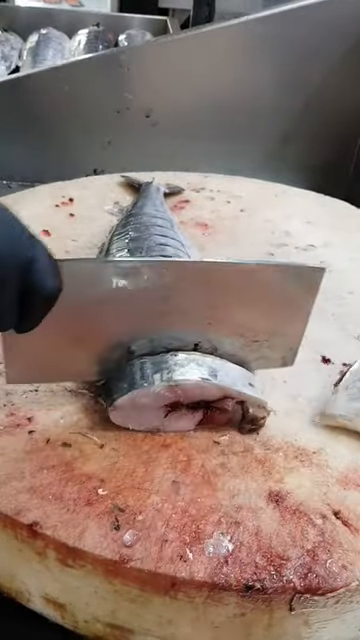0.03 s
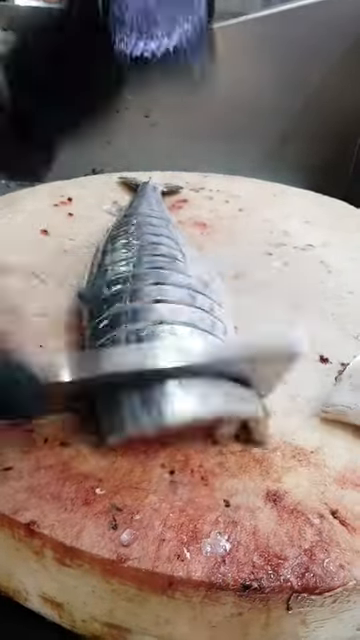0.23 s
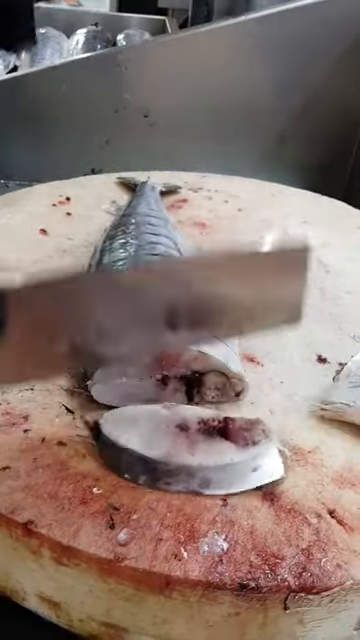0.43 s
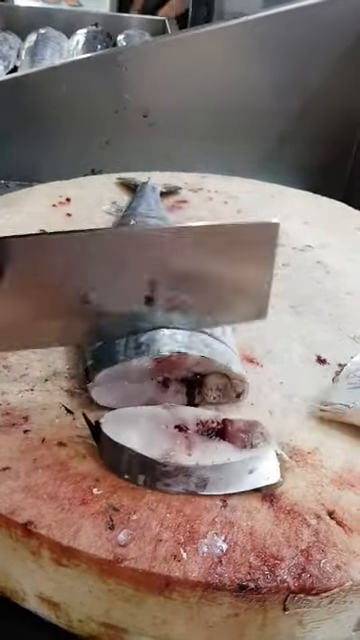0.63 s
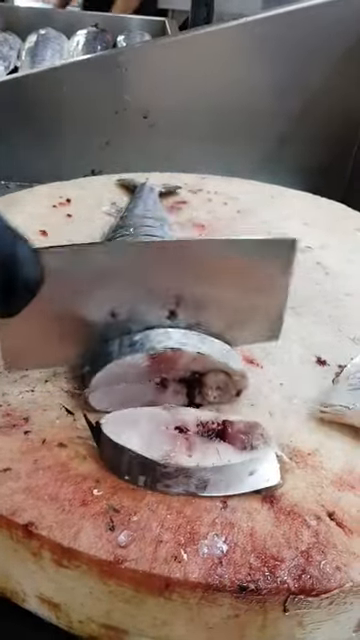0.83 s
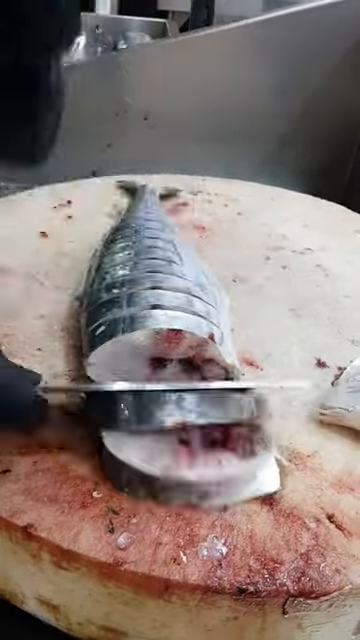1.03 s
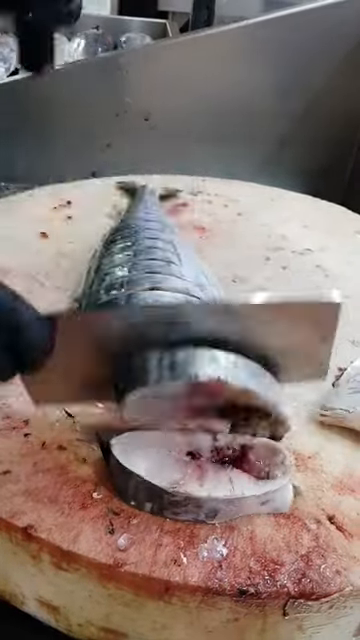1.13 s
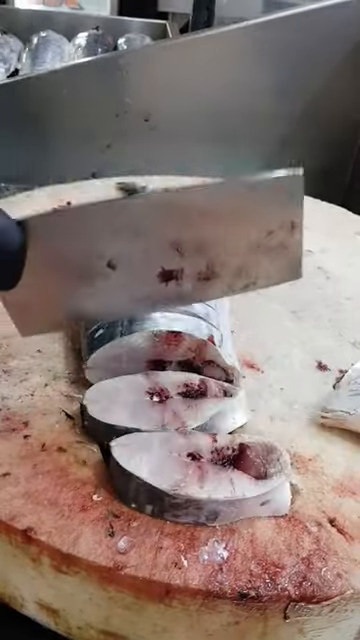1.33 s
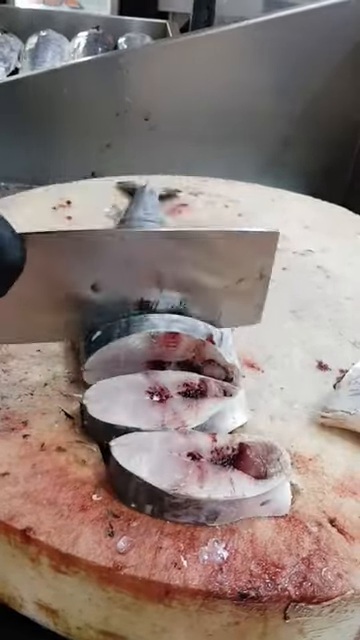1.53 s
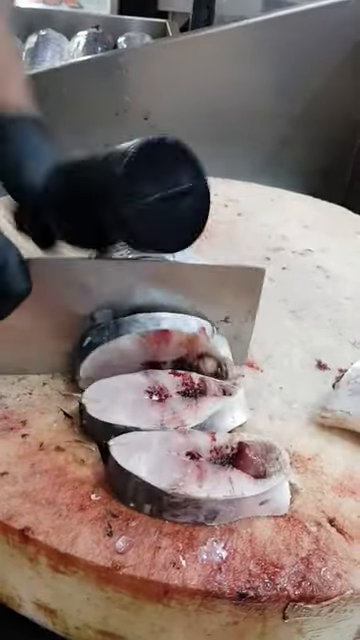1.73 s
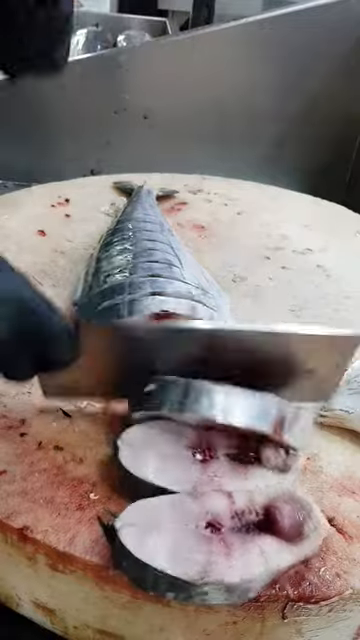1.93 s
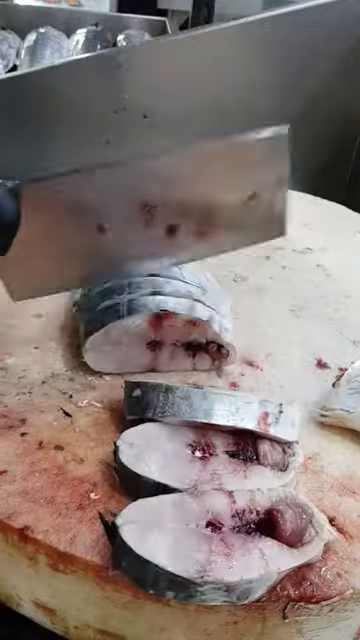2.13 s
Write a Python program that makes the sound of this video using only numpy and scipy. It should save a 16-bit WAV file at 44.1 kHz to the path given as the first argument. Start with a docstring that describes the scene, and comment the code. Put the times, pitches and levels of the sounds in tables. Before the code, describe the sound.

A mallet drives a cleaver through fish three times, at about 0.25, 1.0 and 1.8 seconds. Each blow is a sharp knock with a short steel ring and a deep thud on a wooden block; the first also snaps bone. Soft slice flops, faint wet slides and small ticks follow the cuts. Everything is close and louder on the left, over low, steady kitchen ventilation and faint machine hum.

```python
"""A kitchen, a stereo microphone close to the chopping block, the left side louder.
Over low ventilation noise and faint machine hum, wet fish rustles against a heavy cleaver.
A mallet strikes the spine: the blade rings until the flesh grips it, the edge lands on the thick wooden
block, the stand booms and a slice flops over. The first blow snaps the backbone. Two more cuts follow,
with wet rustles and ticks between them. A limiter flattens the blows."""
import sys
import numpy as np
from scipy import signal
from scipy.fft import rfft, irfft
from scipy.io import wavfile
from scipy.ndimage import uniform_filter1d, minimum_filter1d

SR = 44100
rng = np.random.default_rng(int(sys.argv[2]) if len(sys.argv) > 2 else 0)


def put_to_file(sound):
    """Save the sound as 16-bit audio at rate SR, in the file named by the first command-line argument."""
    columns = np.atleast_2d(sound).T  # one column per channel
    safe = np.clip(columns, -1, 1)
    whole_steps = np.round(safe * 32767)
    wavfile.write(sys.argv[1], SR, whole_steps.astype(np.int16))


N = 97020
TIME = np.arange(SR) / SR  # one second, the span of a single event

# right microphone against the left: frequency_hz, gain_db
CLOSE_RIGHT = [(50, -20), (250, -7.5), (1000, -10), (2500, -9), (5000, -17.5), (12000, -6)]  # sounds at the block
AIR_RIGHT = [(50, -13.5), (300, -12), (1000, -13.5), (4000, -11.5), (12000, -6.5)]  # ventilation and wet slides
# likeness of the two microphones: frequency_hz, correlation
MIC_LIKENESS = [(60, 0.81), (170, 0.82), (350, 0.71), (1000, 0.3), (3000, 0.19), (12000, 0.2)]

# machine tones: pitch_hz, level_db
MACHINE_TONES = [(97, -61), (657, -65), (1174, -64), (1567, -67.5), (1954, -89), (2422, -69.5)]
# wet flesh sliding on steel: start_s, length_s, level_db
WET_SLIDES = [(0.031, 0.12, -59), (0.625, 0.35, -62), (1.12, 0.16, -55), (1.476, 0.18, -57),
              (1.655, 0.13, -56.5), (1.871, 0.16, -53.5)]
# blade touching scales and bone: start_s, level_db
BONE_TICKS = [(0.111, -44), (1.400, -39.5), (1.573, -42.5)]
# mallet blows: start_s, ring_db, grip_after_s, upper_modes_db, knock_db, crack_db, lead_noise_db
MALLET_BLOWS = [(0.2466, 1.5, .018, -1, -14.5, -23.5, -17.5), (0.9848, 0, 0.043, 0.5, -17.5, -29, -29.5),
                (1.8213, 1, 0.044, -2.5, -15.5, -47, -27.5)]
# block shaken through the fish: start_s, boom_db, upper_modes_db, thud_db
BLOCK_PUSHES = [(0.25, -6, -3.5, -9), (0.9870, -4.5, 0, -12.5), (1.8230, -7.5, -1, -21.5)]
# edge landing and rebounding on the block: peak_s, thump_db, clack_db
EDGE_LANDINGS = [(0.2755, -9, -29), (0.293, -7, -22), (1.0163, -13.5, -11.5), (1.045, -9.5, -23),
                 (1.8530, -8.5, -11.5)]
# cut slices flopping over: start_s, level_db
SLICE_FLOPS = [(0.413, -45), (1.164, -34), (2.006, -37)]

# resonances: pitch_hz, level_db, t60_s
BLADE_MODES = [(480.6, -20, 0.29), (530.6, -19.5, 0.44), (629, -21.5, 0.43), (669, -20.5, 0.33),
               (902.5, -19, 0.49), (960, -33, 0.11), (1020.7, 0, 0.12), (1614, -14, 0.12),
               (1770, -25, 0.21), (2225, -32, 0.067), (2235, -28, 0.19), (2983, -32.5, 0.042),
               (3180, -30.5, 0.086), (3957, -40.5, 0.16)]  # the steel cleaver
BLOCK_MODES = [(50.6, -12, 0.18), (68, 1.5, 0.091), (94.6, 3, 0.33), (122.2, -23, 0.12), (159.7, 0.5, 0.22),
               (191.2, -16, 0.33), (225.9, -5.5, 0.25), (256.6, -10.5, 0.2), (317.4, -13, 0.29),
               (391.3, -16.5, 0.37)]  # the block and its stand

# noise colours: frequency_hz, relative_density_db
AIR_COLOUR = [(15, -38), (28, -19), (86, 1.5), (152, -2), (209, 2.5), (280, -10), (400, -12.5), (666, -13),
              (1100, -18.5), (2000, -20), (2900, -19.5), (3900, -24.5), (5000, -31), (7600, -35),
              (9500, -30), (12500, -31.5), (15500, -42.5)]  # ventilation
RUSTLE_COLOUR = [(30, -13), (100, 1), (220, -3), (350, -17), (700, -7.5), (1200, -22), (3000, -23.5),
                 (8000, -40)]  # soft low rustle before the first blow
WET_COLOUR = [(300, -27), (1500, -13), (3500, 7.5), (6500, -1.5), (10000, 5.5), (13000, 3), (16000, -5)]  # flesh on steel
TICK_COLOUR = [(500, -9), (2800, -17), (3700, 7), (4700, -20), (8000, -16), (11000, -6), (16000, -22)]  # steel on scales and bone
LEAD_NOISE_COLOUR = [(150, 20), (600, 12), (1500, -9), (3000, -11.5), (6000, -19), (11000, -10.5),
                     (16000, -27)]  # a short burst of noise just before each blow
KNOCK_COLOUR = [(40, -5), (250, -2.5), (600, -3), (780, -5.5), (1050, -6.5), (1700, -6), (2600, -20.5),
                (4000, -25), (6000, -38.5), (10000, -37), (16000, -48)]  # the body of a blow
CRACK_COLOUR = [(300, 1), (1500, -9), (2400, 9), (2950, 13), (3600, -1), (5000, -24), (10000, -4),
                (16000, -15)]  # the bright edge of a blow
SNAP_COLOUR = [(600, -15), (1300, 10), (1800, -0.5), (2400, -2.5), (2950, 5.5), (3500, -6), (4050, -6.5),
               (5000, -12.5), (8000, -17.5), (16000, -14)]  # the backbone breaking
THUD_COLOUR = [(20, -15), (45, -4), (75, -16), (160, -4), (240, -4), (330, -22), (700, -40), (2000, -87)]  # fish against the block
TAIL_COLOUR = [(30, -29), (95, 8.5), (200, -5.5), (320, -13.5), (520, -3.5), (750, -18), (1000, -11),
               (1700, -23), (3000, -35), (6000, -50), (10000, -41), (16000, -75)]  # the wash after each thud
RUMBLE_COLOUR = [(30, -31), (70, -23), (96, 6), (125, -15), (220, -27.5), (500, -42), (2000, -68)]  # the room's low resonance
CLACK_COLOUR = [(100, 21), (300, -4), (520, -6.5), (780, -3), (1000, -9.5), (1600, -11.5), (2600, -14.5),
                (4000, -28.5), (7000, -38.5), (16000, -37)]  # the edge on wood


def amp(db):
    """Decibels to gain."""
    return 10 ** (np.asarray(db) / 20)


def pan(right_db):
    """Gains for the two microphones, with the left at unity."""
    return amp([[0], [right_db]])


def curve_at(points, hz):
    """Reads a table along a logarithmic frequency axis."""
    table_hz, values = np.transpose(points)
    return np.interp(np.log(hz + 1), np.log(table_hz), values)


def add(mix, start_s, sound):
    """Adds a stereo sound to the mix at start_s."""
    part = mix[:, round(start_s * SR):][:, :sound.shape[1]]
    part += sound[:, :part.shape[1]]


def noise(colour, right_gain=CLOSE_RIGHT, size=SR):
    """Coloured noise, partly alike at the two microphones, with rms 1 on the left."""
    hz = np.fft.rfftfreq(size, 1 / SR)
    left, unrelated = rfft(rng.standard_normal((2, size))) * amp(curve_at(colour, hz)) * hz / (hz + 8)
    alike = np.clip(curve_at(MIC_LIKENESS, hz), 0, 1)
    right = (alike * left + np.sqrt(1 - alike ** 2) * unrelated) * amp(curve_at(right_gain, hz))
    pair = irfft([left, right], size)
    return pair / pair[0].std()


def fade(rise_s, t60_s):
    """A quick rise and an exponential decay."""
    return (1 - np.exp(-TIME / rise_s)) * np.exp(-np.log(1000) * TIME / t60_s)


def swell(length_s):
    """A half-sine rise and fall."""
    return np.sin(np.pi * np.minimum(TIME / length_s, 1))


def burst(colour, db, rise_s, t60_s):
    """A dying burst of noise."""
    return amp(db) * noise(colour) * fade(rise_s, t60_s)


def ring(hz, db, t60_s, rise_s):
    """One dying mode."""
    return amp(db) * fade(rise_s, t60_s) * np.sin(2 * np.pi * hz * TIME)


def ventilation(level_db=-46.5, patch_db=2):
    """Low air noise behind everything, drifting in patches of time and frequency."""
    spectrum = signal.stft(noise(AIR_COLOUR, AIR_RIGHT, size=N), nperseg=1024)[2]
    patches = uniform_filter1d(rng.standard_normal(spectrum.shape[1:]), size=14, axis=0)
    patches = uniform_filter1d(patches, size=9, axis=1)
    spectrum *= amp(patch_db * patches / patches.std())
    return amp(level_db) * signal.istft(spectrum)[1][:, :N]


def machine_hum():
    """Faint kitchen machine tones, each wavering in phase."""
    hum = 0
    for hz, db in MACHINE_TONES:
        drift = np.cumsum(rng.standard_normal(N)) * 0.011
        hum += np.sqrt(2) * amp(db) * np.sin(2 * np.pi * hz * np.arange(N) / SR + drift)
    return hum * pan(right_db=-10)


def flesh():
    """The fish heard close: slices flop, wet flesh slides on steel, scales and bone tick on the blade."""
    out = np.zeros((2, N))
    for start_s, db in SLICE_FLOPS:
        add(out, start_s, burst(THUD_COLOUR, db, rise_s=0.0051, t60_s=0.28))
    for start_s, length_s, db in WET_SLIDES:
        grain = amp(2.5 * np.repeat(rng.standard_normal(SR // 100), 100))  # the level flickers
        add(out, start_s, amp(db) * noise(WET_COLOUR, AIR_RIGHT) * grain * swell(length_s))
    for start_s, db in BONE_TICKS:
        add(out, start_s, burst(TICK_COLOUR, db, rise_s=0.00081, t60_s=0.026))
    add(out, start_s=0.03, sound=amp(-42.5) * noise(RUSTLE_COLOUR) * swell(length_s=0.24))
    return out


def mallet(lead_noise_s=0.007, lead_noise_release_s=0.011):
    """A short burst of noise just before each blow, then the mallet's knock and crack on the spine."""
    out = np.zeros((2, N))
    release = np.exp(-(TIME / lead_noise_release_s) ** 4)
    for start_s, *_, knock_db, crack_db, lead_noise_db in MALLET_BLOWS:
        lead_noise = burst(LEAD_NOISE_COLOUR, lead_noise_db, rise_s=0.0013, t60_s=0.15)
        add(out, start_s - lead_noise_s, lead_noise * release)
        add(out, start_s, burst(KNOCK_COLOUR, knock_db, rise_s=0.00078, t60_s=0.15))
        add(out, start_s, burst(CRACK_COLOUR, crack_db, rise_s=0.0001, t60_s=0.03))
    return out


def blade(grip_width_s=0.002):
    """The struck steel rings until the flesh grips it, damping its main bending mode most of all."""
    out = np.zeros((2, N))
    for start_s, ring_db, grip_after_s, upper_db, *_ in MALLET_BLOWS:
        grip = 0.5 * (1 + np.tanh((TIME - grip_after_s) / grip_width_s))
        tone = 0
        for hz, db, t60_s in BLADE_MODES:
            grip_db = -15 if 850 < hz < 1300 else -10
            mode = ring(hz, db + upper_db * (hz > 1300), t60_s, rise_s=0.0041)
            tone += mode * amp(grip * grip_db)
        add(out, start_s, tone * amp(ring_db) * pan(right_db=-16))
    return out


def backbone():
    """The bone snaps under the first blow."""
    out = np.zeros((2, N))
    add(out, start_s=0.2474, sound=burst(SNAP_COLOUR, db=-17, rise_s=0.0001, t60_s=0.03))
    return out


def block_boom(rise_s=0.049):
    """The push through the flesh builds up a boom in block and stand; the room rumbles on."""
    out = np.zeros((2, N))
    build_up = np.minimum(TIME / rise_s, 1)
    for start_s, boom_db, upper_db, thud_db in BLOCK_PUSHES:
        boom = sum(ring(hz, db + upper_db * (hz > 110), t60_s, rise_s) for hz, db, t60_s in BLOCK_MODES)
        add(out, start_s, amp(boom_db) * boom * build_up * pan(right_db=-12))
        add(out, start_s, burst(THUD_COLOUR, thud_db, rise_s=0.012, t60_s=0.27))
        add(out, start_s, burst(TAIL_COLOUR, db=-21, rise_s=0.019, t60_s=0.47))
        add(out, start_s, burst(RUMBLE_COLOUR, db=-27.5, rise_s=0.019, t60_s=1.0))
    return out


def wall_echoes(sound, level_db=-14, delay_s=0.01):
    """Diffuse echoes come back to the microphone from the steel splashback and the walls."""
    tail = rng.standard_normal((2, SR)) * fade(rise_s=0.0055, t60_s=0.36) * (TIME > delay_s)
    tail /= np.linalg.norm(tail, axis=1, keepdims=True)
    return signal.fftconvolve(sound[:1], tail, axes=1)[:, :N] * amp(level_db) * pan(right_db=-14.5)


def edge_on_wood(thump_width_s=0.00267):
    """The edge lands or rebounds on the block: one low pressure pulse and a clack each time."""
    out = np.zeros((2, N))
    for peak_s, thump_db, clack_db in EDGE_LANDINGS:
        offset = (np.arange(N) / SR - peak_s) / thump_width_s
        pulse = (1 - offset ** 2) * np.exp(-offset ** 2 / 2)
        out += amp(thump_db) * pulse * pan(right_db=-12)
        add(out, peak_s - thump_width_s, burst(CLACK_COLOUR, clack_db, rise_s=0.0005, t60_s=0.23))
    return out


def scene():
    """Three cuts close to the microphone, the kitchen behind them."""
    steel = blade()
    cuts = mallet() + steel + backbone() + wall_echoes(steel) + block_boom() + edge_on_wood()
    return cuts + flesh() + ventilation() + machine_hum()


def record(dry, limit_db=-1.5, recover_db_per_s=227, cutoff_hz=15700):
    """A fast peak limiter shared by both channels, then a steep low-pass."""
    peak = -minimum_filter1d(-abs(dry).max(0), size=90)
    over_db = np.maximum(20 * np.log10(peak + 1e-9) - limit_db, 0)
    recovery_db = np.arange(N) * recover_db_per_s / SR
    held_db = np.maximum.accumulate(over_db + recovery_db) - recovery_db
    gain = amp(-uniform_filter1d(held_db, size=45))
    low_pass = signal.firwin(511, cutoff_hz, window=("kaiser", 9), fs=SR)
    return signal.oaconvolve(dry * gain, low_pass[None], "same")


dry = scene()
out = record(dry)
put_to_file(out)
```